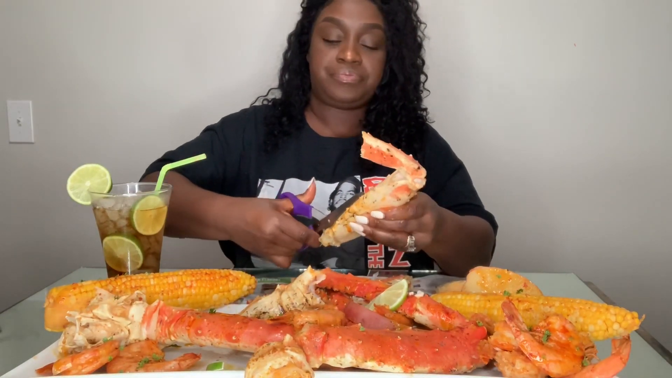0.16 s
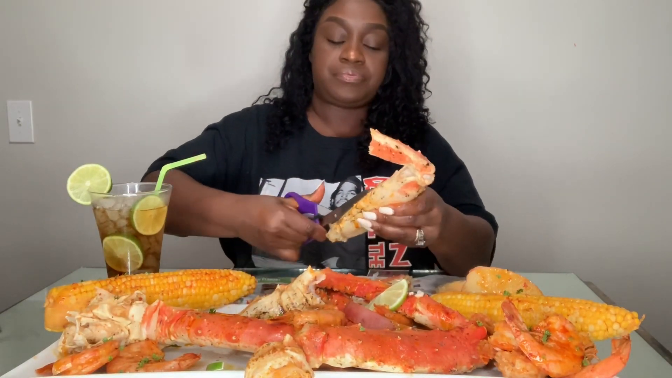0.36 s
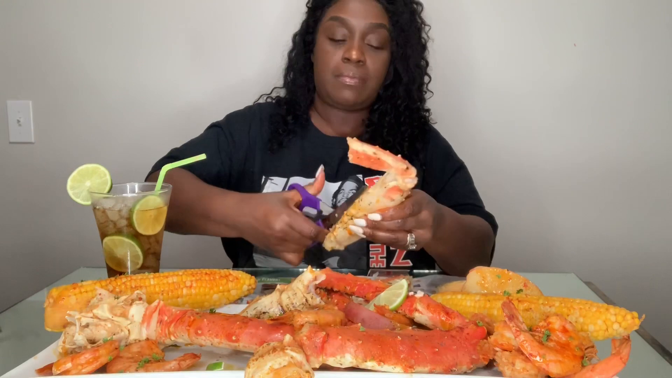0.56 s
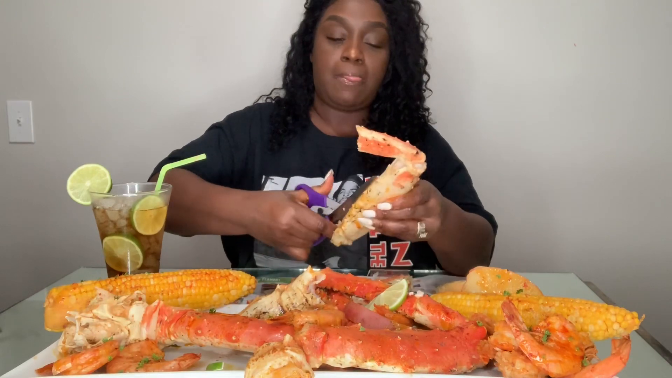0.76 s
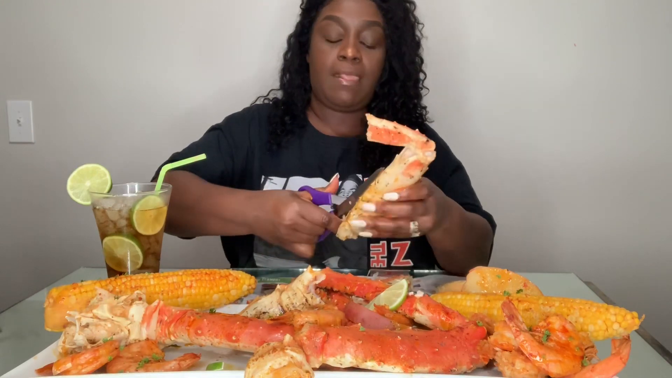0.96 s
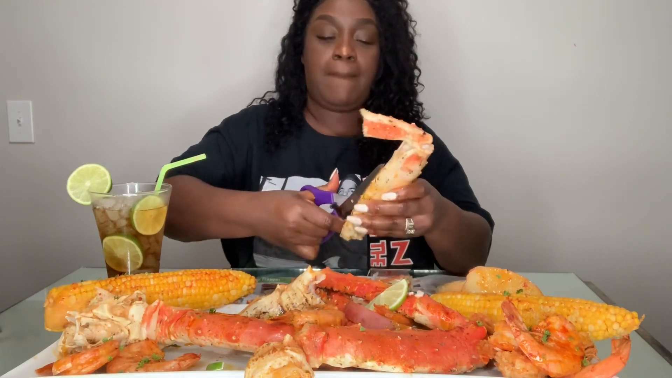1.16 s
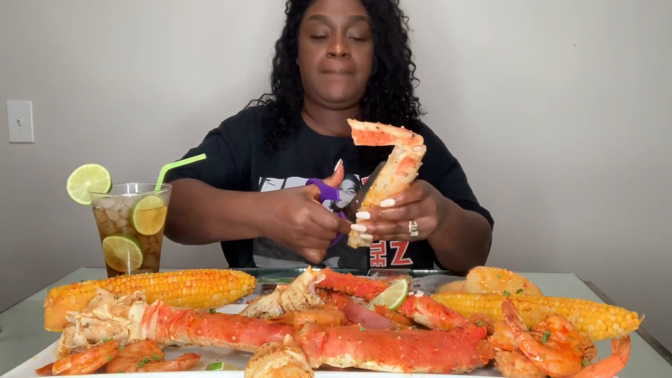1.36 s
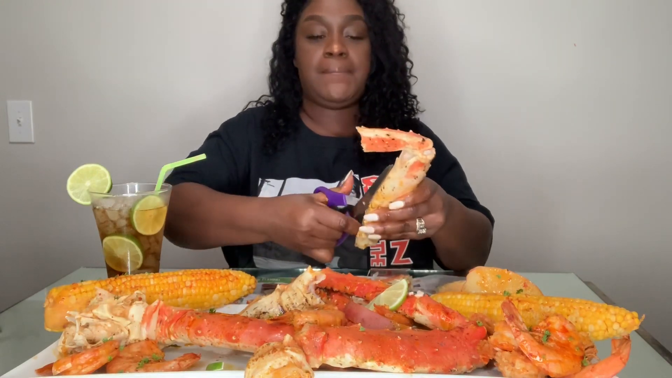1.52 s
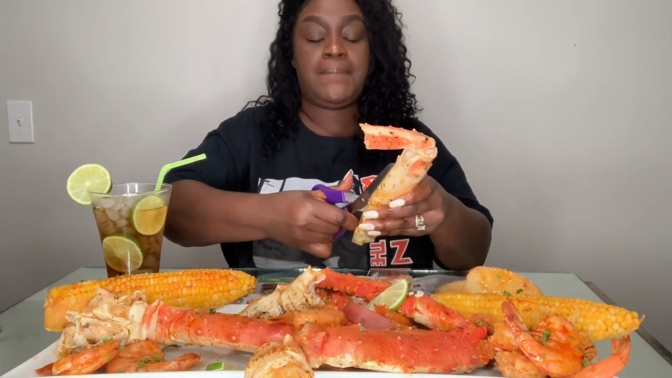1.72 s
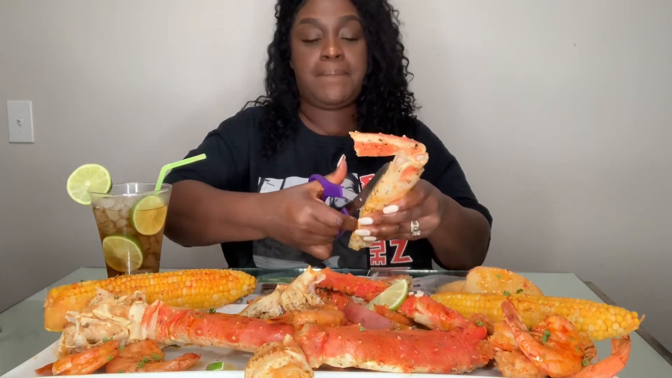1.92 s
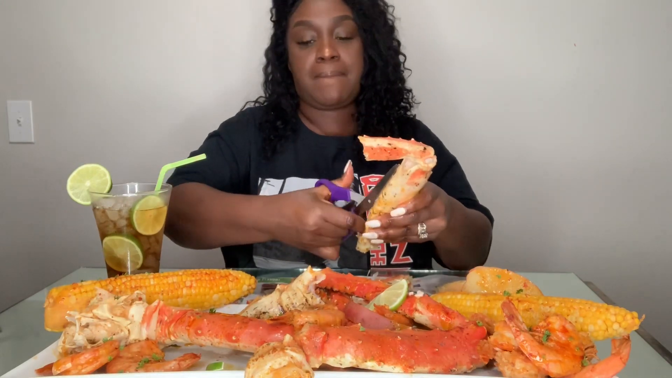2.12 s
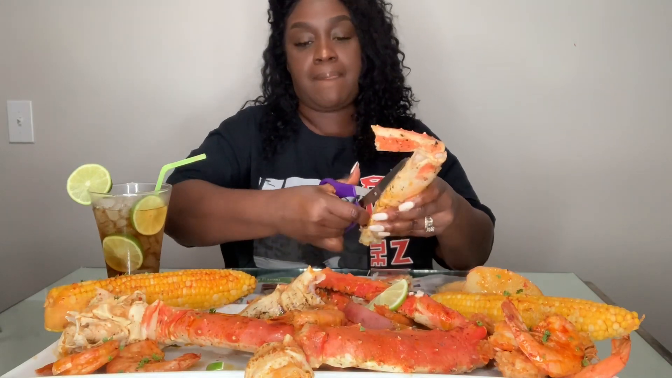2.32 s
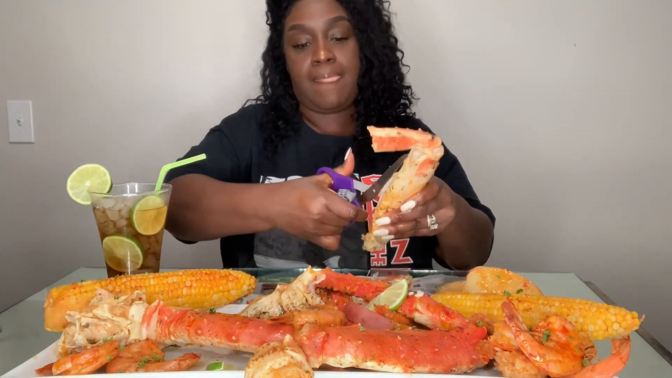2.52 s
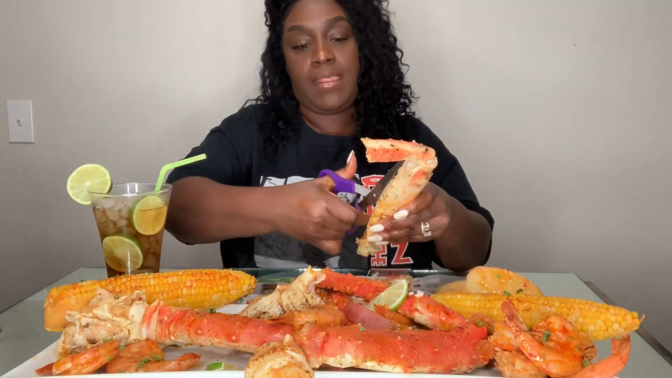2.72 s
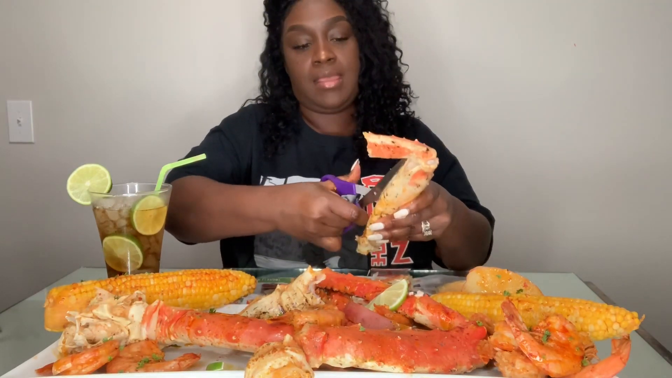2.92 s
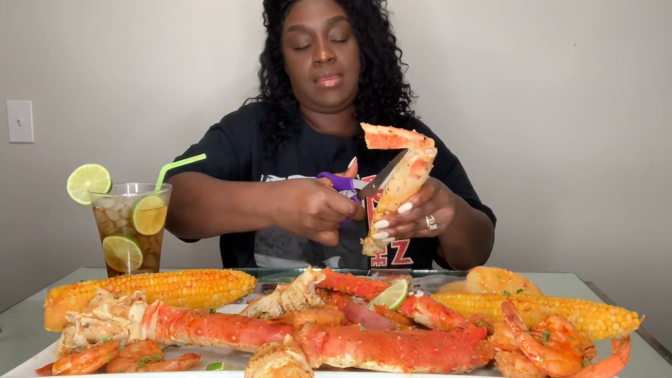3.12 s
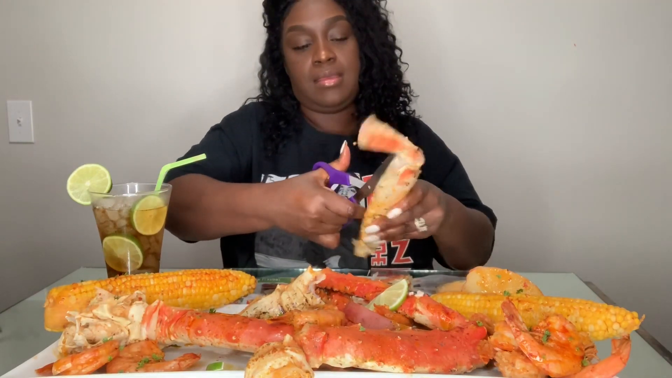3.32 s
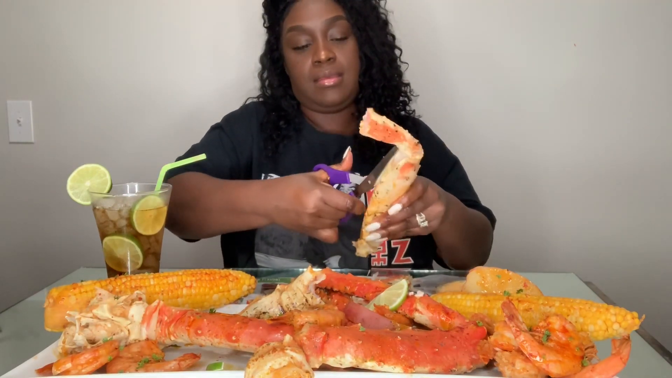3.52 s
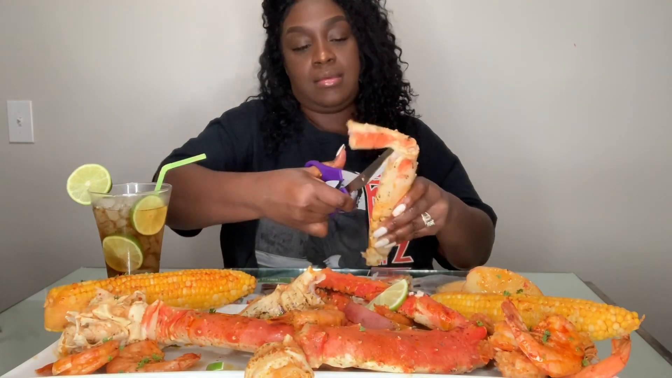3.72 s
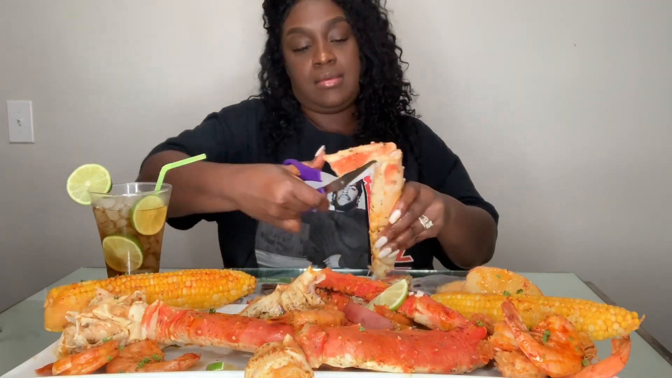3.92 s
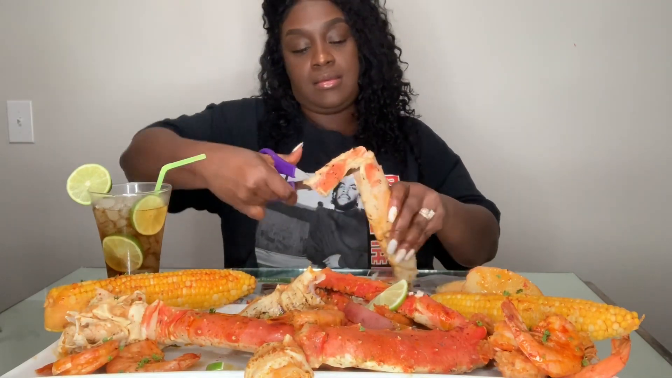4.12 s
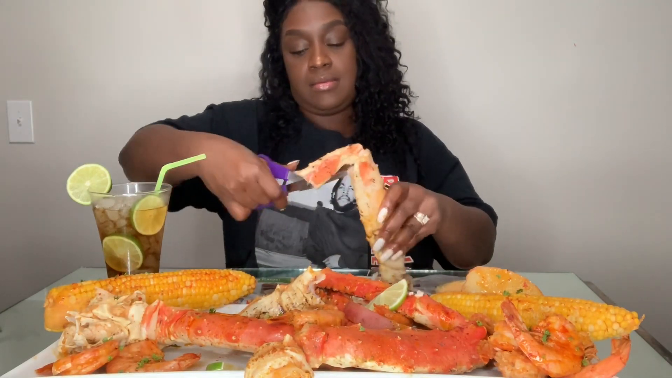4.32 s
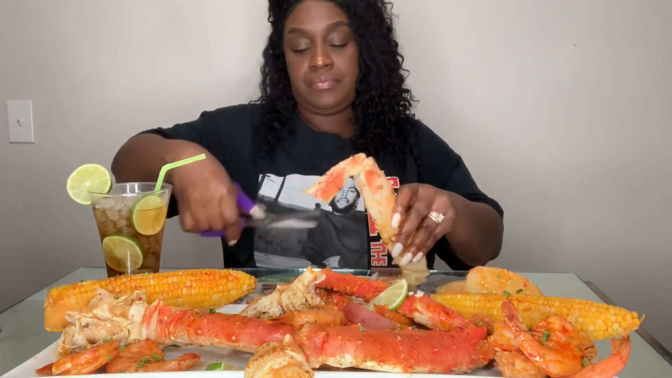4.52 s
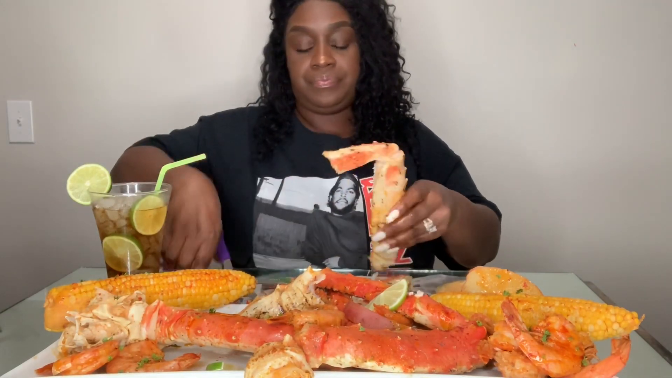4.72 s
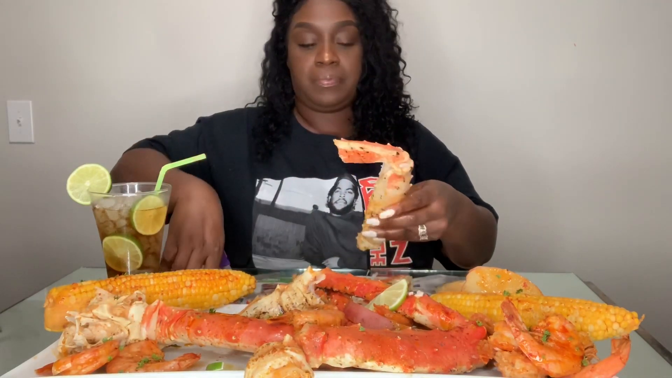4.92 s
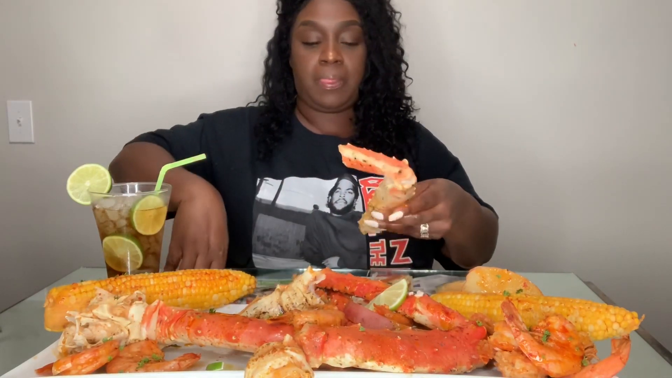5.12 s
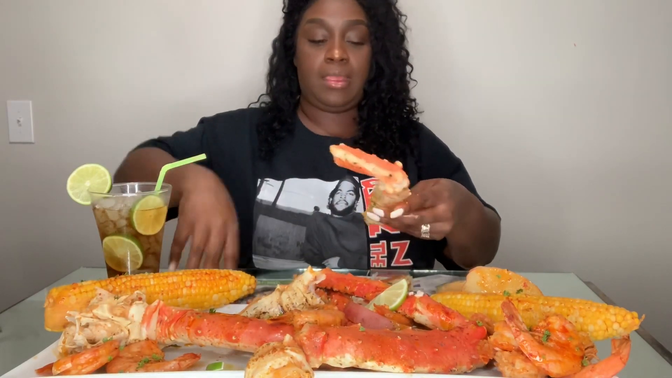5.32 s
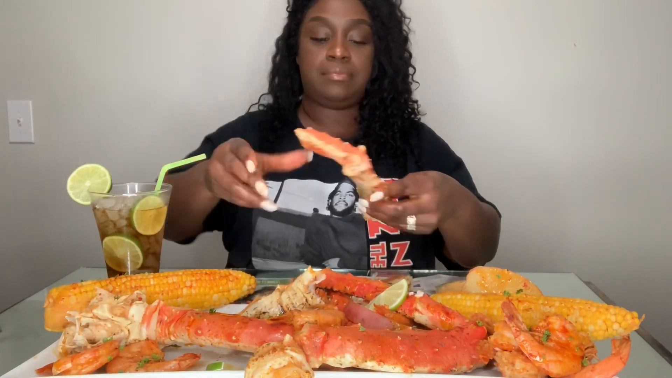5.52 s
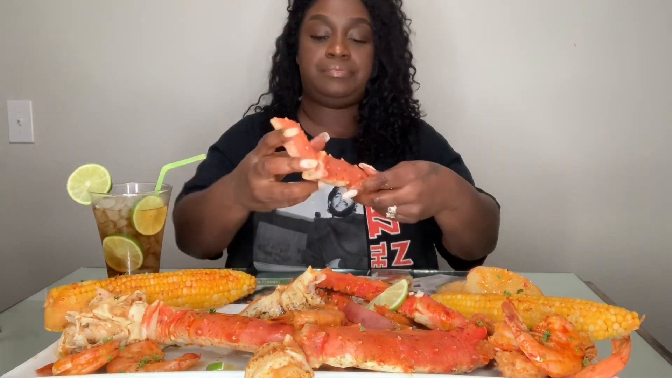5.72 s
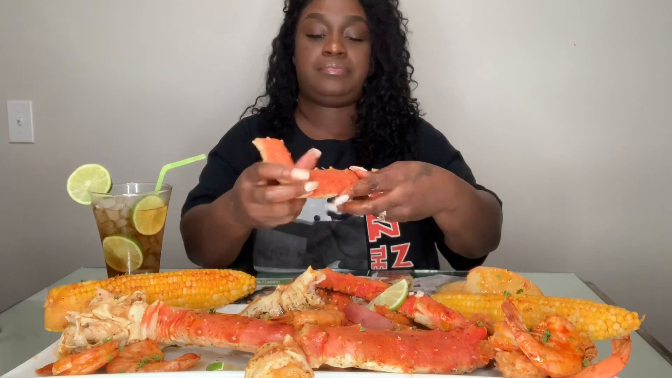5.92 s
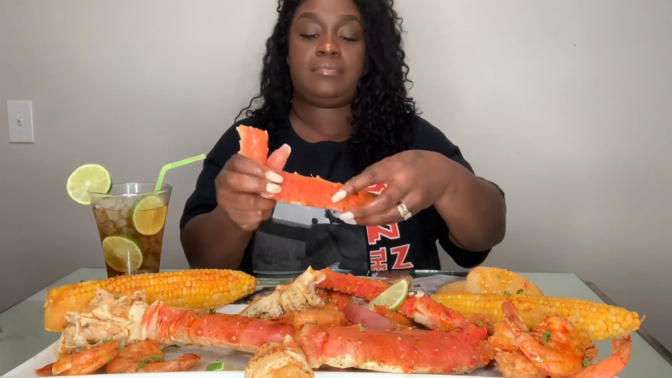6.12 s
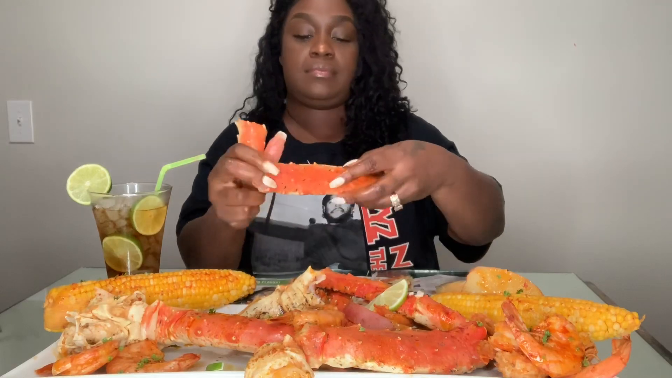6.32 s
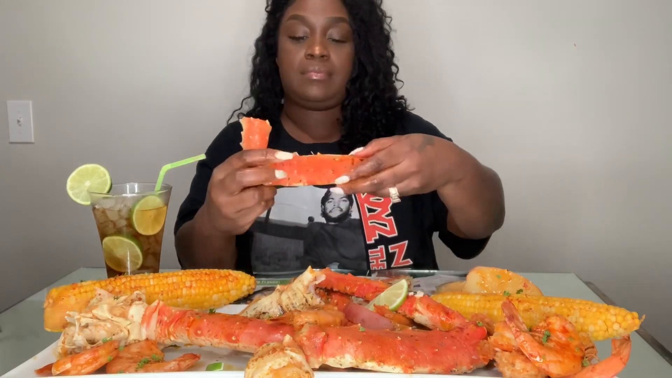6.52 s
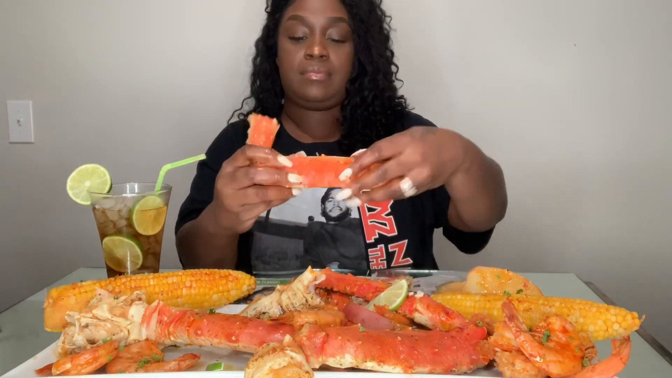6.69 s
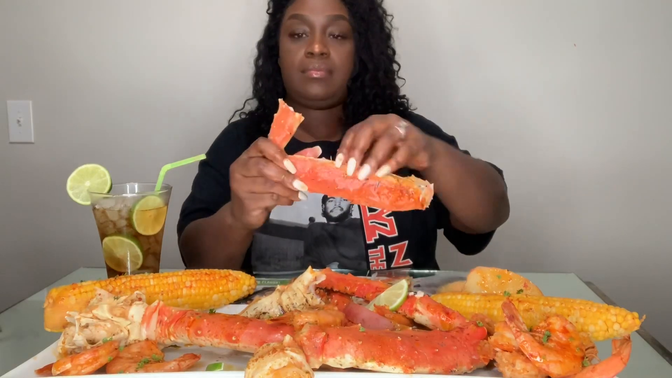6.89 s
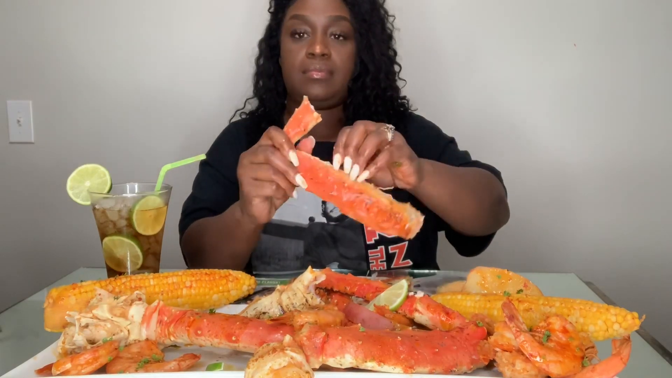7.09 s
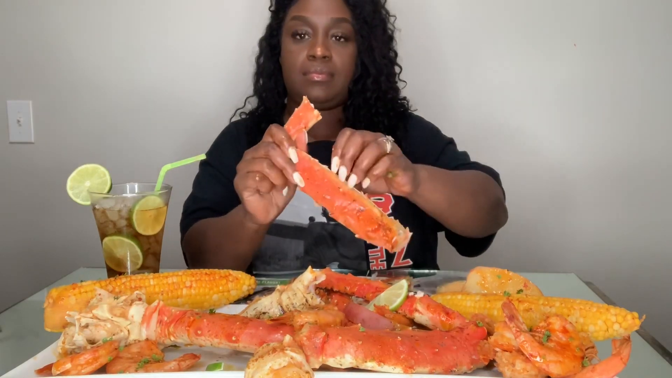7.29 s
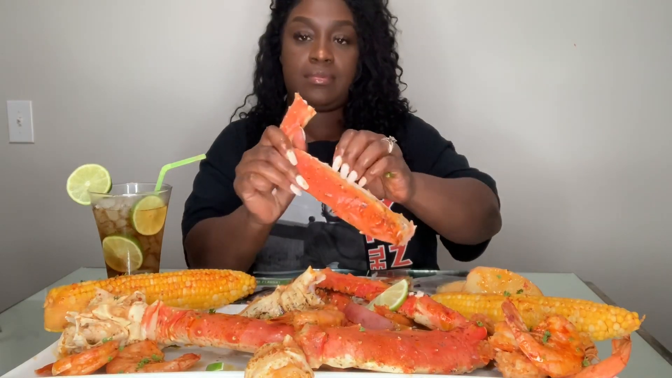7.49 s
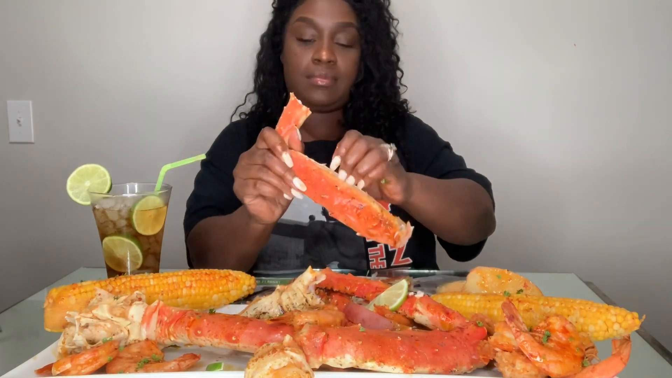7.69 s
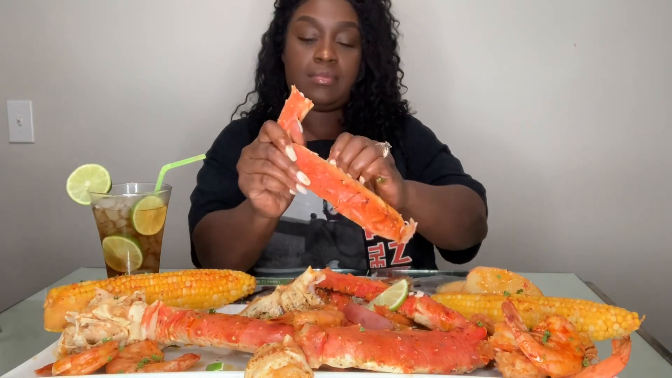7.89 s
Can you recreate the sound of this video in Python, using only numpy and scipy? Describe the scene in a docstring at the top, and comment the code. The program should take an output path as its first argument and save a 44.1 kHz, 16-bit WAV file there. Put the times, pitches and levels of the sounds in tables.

```python
"""In a small bare kitchen, kitchen shears bite through a crab leg close to two microphone ports.
Each crack is a short volley of fractures ringing the hollow leg and shell; scraping is a hail of
tiny fractures. The shears clatter down on the table on steel modes, the table top booms, and fingers
pry the shell open. Echoes and a tail of changing colour answer; shaped noise makes the ventilation
rumble, drone and hum underneath. Both ports clip whatever exceeds full scale."""
import sys
import numpy as np
from scipy import signal
from scipy.fft import rfft, irfft
from scipy.io import wavfile
from scipy.ndimage import uniform_filter1d

SR = 44100
rng = np.random.default_rng(int(sys.argv[2]) if len(sys.argv) > 2 else 0)


def to_wav(s):
    """Save 16-bit WAV."""
    ch = np.atleast_2d(s).T  # columns
    pcm = np.round(np.clip(ch, -1, 1) * 32767)  # PCM
    wavfile.write(sys.argv[1], SR, pcm.astype(np.int16))


N = 350595  # length in samples


def gain_of(db):
    """Amplitude factor of a level in dB."""
    return 10 ** (np.asarray(db) / 20)


def evened(x):
    """Scales a sound to rms 1."""
    return x / np.sqrt(np.mean(x ** 2) + 1e-20)


def read_curve(points, hz):
    """Reads a (Hz, value) table along a logarithmic frequency axis."""
    f, value = np.transpose(points)
    return np.interp(np.log(hz + 1), np.log(f + 1), value)


def add(mix, start_s, sound):
    """Lays a sound into the mix, cut off at the end of the mix."""
    part = mix[round(start_s * SR):][:len(sound)]
    part += sound[:len(part)]


def ring(x, modes):
    """Sum of resonances; white noise of rms 1 comes out with rms about 1."""
    out, power = 0, 0
    for k, (hz, width_hz, db) in enumerate(modes):
        sign = (-1) ** k
        resonance = signal.lfilter(*signal.iirpeak(hz, hz / width_hz, SR), x)
        out = out + sign * gain_of(db) * resonance
        power += gain_of(2 * db) * np.pi * width_hz / SR
    return out / np.sqrt(power)


def stereo_spectra(hz, frames, likeness):
    """Two random short-time spectra, as alike left and right as the likeness table says."""
    a, b, c, d = rng.standard_normal((frames, len(hz), 4)).T
    like = np.clip(read_curve(likeness, hz), -1, 1)[:, None]
    left, other = a + 1j * b, c + 1j * d
    return np.array([left, like * left + np.sqrt(1 - like ** 2) * other])


# Colour of the ventilation air. Each row: frequency in Hz, relative level in dB per Hz.
AIR_COLOUR = [(8.8, -61), (15, -24.5), (70, -2.5), (92, -14.5), (106, -19), (179, -27), (213, -24.5),
              (321, -29), (455, -34), (559, -35), (726, -37.5), (793, -44.5), (6670, -62.5), (12300, -59.5),
              (16000, -66)]
# How alike the air is at both ports. Each row: frequency in Hz, left-right likeness (1 = same).
AIR_LIKENESS = [(25, .99), (60, .96), (290, .85), (640, .55), (1410, .3), (3100, .05)]
# Droning room modes. Each row: frequency in Hz, width of each filter pass in Hz, level in dB rms.
DRONES = [(53.7, 9.1, -58), (78.53, 13, -48)]
# A low hum comes and goes. Each row: time in seconds, level in dB.
HUM_LEVEL = [(0.0, -54.5), (0.26, -43), (1.77, -53.5), (1.82, -38.5), (2.37, -49.5), (4.74, -54),
             (4.8, -43), (5.11, -60.5), (5.18, -35.5), (5.67, -54), (7.86, -55), (7.95, -46)]
AIR_DB, HUM_HZ, HUM_WIDTH_HZ = -38.5, 129.5, 20


def fuzzy_tone(noise, hz, width_hz):
    """Noise passed twice through one narrow resonance wavers like a fuzzy tone."""
    mode = [(hz, width_hz, 0)]
    return evened(ring(ring(noise, mode), mode))


def ventilation():
    """Steady air noise, two droning room modes and a fuzzy hum, all made from random noise."""
    hz = np.fft.rfftfreq(2048, 1 / SR)
    spectra = stereo_spectra(hz, N // 512 + 5, AIR_LIKENESS)
    spectra = spectra * gain_of(read_curve(AIR_COLOUR, hz))[:, None]
    air = signal.istft(spectra, nperseg=2048, noverlap=1536)[1][:, :N]
    air = gain_of(AIR_DB) * evened(air)
    noise = rng.standard_normal((3, N))
    drones = sum(gain_of(db) * fuzzy_tone(x, hz, width_hz)
                 for x, (hz, width_hz, db) in zip(noise, DRONES))
    hum_db = np.interp(np.arange(N) / SR, *np.transpose(HUM_LEVEL))
    hum = gain_of(hum_db) * fuzzy_tone(noise[2], HUM_HZ, HUM_WIDTH_HZ)
    return air + drones + hum


# Modes of the crab leg, close by: the air in the hollow leg, the whole leg flexing, the shell plates
# and the splinters. Each row: frequency in Hz, width in Hz, level in dB relative to its own set.
LEG_AIR = [(1150, 390, 0), (1607, 210, -2)]
LEG_KNOCK = [(422, 260, -4), (581, 94, 2), (860, 430, -4)]
SHELL_SNAP = [(2196, 960, 3.5), (2446, 1950, 7), (3652, 750, 4.5), (4040, 380, -1.5), (4910, 2400, -3.5)]
SPLINTER_FIZZ = [(6430, 4000, -8), (8360, 820, 2.5), (10000, 410, 3.5), (12500, 1900, -3),
                 (14600, 3200, -6.5)]
# Blades and fingers scraping and crushing shell. Each row: start in seconds, length in seconds,
# level in dB, splinter fizz against the hollow-leg ring in dB.
SCRAPES = [(0, 0.021, -51, 0.5), (0.188, 0.16, -33, 1.5), (0.531, 0.078, -40, -4.5),
           (0.741, 0.19, -52, 13.5), (0.987, 0.23, -58.5, 4.5), (1.191, 0.13, -47, -0.5),
           (1.478, .14, -43, 5.5), (1.671, 0.044, -41, 13.5), (1.9, 0.093, -39.5, -7.5),
           (2.477, 0.14, -47.5, 1), (2.571, 0.18, -38.5, -6.5), (2.96, 0.22, -43, -1),
           (3.29, 0.14, -40.5, -4.5), (3.51, 0.11, -49, 9.5), (3.684, 0.2, -35.5, -6.5),
           (3.866, 0.27, -47, 1), (4.105, 0.087, -37, -11.5), (4.426, 0.049, -46, -4.5),
           (4.776, .16, -46, -2.5), (4.978, 0.16, -49, -4), (5.747, 0.052, -49, -21.5),
           (5.97, .12, -58, -11.5), (6.077, .13, -54.5, -34), (6.267, 0.057, -64, -20),
           (6.547, 0.2, -72, -23), (6.735, 0.1, -51, -20), (6.865, 0.11, -53, -24.5),
           (7.02, 0.24, -53, -24), (7.325, 0.058, -46.5, -24.5), (7.434, .1, -51, -15.5),
           (7.593, 0.25, -48.5, -15), (7.83, 0.074, -29, -12)]
GRAINS_PER_S, GRAIN_SPREAD_DB = 1800, 4.0
# dB against the hollow-leg ring; the shell plates also gain a share of the fizz dB
SCRAPE_SNAP_DB, SCRAPE_SNAP_PER_FIZZ, SCRAPE_KNOCK_DB = 4.9, 0.28, -11.5


def crunch():
    """Each stroke is a random hail of tiny fractures that swells and fades, ringing leg and shell."""
    out = np.zeros(N)
    size_db = GRAIN_SPREAD_DB * np.minimum(rng.exponential(1, N), 5)
    size = gain_of(size_db) * rng.standard_normal(N)
    struck = rng.random(N) < GRAINS_PER_S / SR
    hail = np.pad(size * struck, (0, SR))
    for start_s, length_s, db, fizz_db in SCRAPES:
        n = round(length_s * SR)
        grains = evened(hail[round(start_s * SR):][:n])
        stroke = np.pad(grains * signal.windows.tukey(n, .7), (0, 800))  # time to ring out
        snap_db = SCRAPE_SNAP_DB + SCRAPE_SNAP_PER_FIZZ * fizz_db
        body = ring(stroke, LEG_AIR) + gain_of(SCRAPE_KNOCK_DB) * ring(stroke, LEG_KNOCK)
        snap = gain_of(snap_db) * ring(stroke, SHELL_SNAP)
        fizz = gain_of(fizz_db) * ring(stroke, SPLINTER_FIZZ)
        add(out, start_s, gain_of(db) * (body + snap + fizz))
    return out


def peaked(x, volley_ms):
    """Scales a burst to the energy of a volley of height 1."""
    return x / np.sqrt(np.sum(x ** 2) / (volley_ms * SR / 1000))


def gripped(modes, chance):
    """The same modes, shifted and weighted anew by where the shell is held and broken."""
    return [(hz * (1 + .05 * a), width_hz, db + 2.0 * b)
            for (hz, width_hz, db), (a, b) in zip(modes, chance)]


# The clear cracks, close by. Each row: time in seconds, ring of the hollow leg in dB, its pitch in Hz,
# knock against the ring in dB, splinter fizz against the ring in dB.
CRACKS = [(0.2207, -11.5, 1020, -50, 1.5), (0.244, -41, 1270, -19, 4), (0.2598, -41, 996, -17, 19),
          (0.2777, -23.5, 1040, -9, 11), (0.3167, -28.5, 1290, 1, 1), (0.58, -34.5, 1530, -1, 5.5),
          (0.7841, -38.5, 993, -27, 10), (0.7935, -31.5, 1590, -2.5, 1), (0.8286, -17.5, 1110, -14, -0.5),
          (0.841, -23, 1500, -23, -7), (0.8729, -19, 1480, -9.5, 3), (0.9072, -24.5, 1320, -6.5, 1),
          (1.0219, -36.5, 1290, -16, -8), (1.2437, -34.5, 1110, 0.5, 8), (1.5307, -23.5, 1150, -1.5, 2),
          (1.5837, -31.5, 1340, -0.5, 8), (1.6152, -36, 1610, -6, 12.5), (1.6845, -22, 1320, -6, -8),
          (1.7025, -24.5, 1650, -30, -3.5), (1.933, -25.5, 1280, -30, -47), (1.9476, -22, 1620, -11.5, -63),
          (2.153, -43.5, 1270, -7, 6.5), (2.2035, -23.5, 1130, -3, 9.5), (2.2593, -14.5, 1620, -1, 1),
          (2.3371, -22, 1330, 2.5, 9), (2.4703, -45.5, 2180, -13.5, 9.5), (2.5137, -36, 1700, -4, -10),
          (2.5732, -28, 1250, -5.5, -49), (2.635, -26, 1300, -9, -13.5), (2.6659, -25, 1280, -1.5, -45),
          (2.8759, -19.5, 1196, -3.5, 2.5), (2.9683, -11, 1470, -2, 6), (2.978, -20, 1650, -9, -13),
          (2.9888, -17.5, 1610, 1.5, 9), (3.0014, -22.5, 1640, -15, 10.5), (3.0713, -22, 1880, -1.5, 4.5),
          (3.0911, -30.5, 1600, -1, 9.5), (3.2023, -36.5, 1720, -5, 8), (3.3282, -30.5, 1570, -8, -15),
          (3.349, -31, 1260, 4.5, -12), (3.37, -18.5, 1480, -3, -22), (3.3947, -30, 1570, -11, -16),
          (3.5651, -31.5, 1240, -2, 0), (3.5813, -20.5, 1190, 1.5, 10.5), (3.6035, -24, 1340, -16, -10),
          (3.6429, -13, 1143, 1.5, 3.5), (3.7094, -29, 1150, 8.5, 7), (3.7679, -23, 1210, 3, -34),
          (3.7938, -18.5, 1226, -31, 0), (3.91, -42, 1367, 6.5, 9), (3.933, -30, 1400, 1.5, -20),
          (4.0985, -16.5, 1220, -8.5, -41.5), (4.155, -30, 1220, -25.5, -14.5),
          (4.312, -47.5, 1870, -19.5, -29), (4.3772, -37.5, 940, 7, -17.5), (4.4724, -38, 1230, -9, 2),
          (4.7643, -17.5, 1600, -8, -34.5), (4.8631, -34.5, 1160, -0.5, -20),
          (5.0003, -37.5, 1300, -1.5, -18), (5.0387, -38.5, 1270, -2.5, -18),
          (5.1352, -37, 1400, -17, -9.5), (5.757, -38, 1520, -6.5, -39.5), (6.105, -46.5, 1160, -13, -37),
          (6.1602, -34.5, 1680, -26.5, -41.5), (6.4106, -39, 1554, -16, -40.5),
          (6.8844, -41, 1176, -8, -40.5), (6.9431, -43, 1010, -8, -27), (7.0309, -34, 1450, -4, -30),
          (7.0592, -24, 1440, -10.5, -40), (7.1482, -28, 1170, -9, -39.5), (7.2311, -33.5, 1630, -5, -12),
          (7.3587, -35.5, 1550, -3, -43.5), (7.4827, -24.5, 1630, -19, -31.5),
          (7.5898, -16.5, 1440, -6.5, -21.5), (7.7343, -35.5, 1380, 2, -54), (7.8293, -28.5, 1720, -8, -49),
          (7.844, -15, 2370, -15.5, 1), (7.864, -15.5, 1204, -37, -1)]
# The shears clatter down on the table. Each row: time in seconds, hollow ring in dB, its pitch in Hz,
# knock against the ring in dB, fizz against the ring in dB.
CLATTERS = [(5.1791, -13.5, 1460, 1, 9.5), (5.1909, -12, 1500, -14, 1), (5.4159, -14.5, 1450, -4, -8.5)]
# Blades and handles, damped by the hand. Each row: frequency in Hz, width in Hz, relative level in dB.
STEEL = [(2150, 700, -3), (2800, 700, 0), (3700, 900, -1), (5200, 1200, 2), (6500, 1200, -2)]
RING_WIDTH_HZ = 200
SWELL_MS, VOLLEY_MS = 1.8, 2.38  # rise, and typical decay, of one volley
VOLLEY_SPREAD = .2  # how much the decay varies, as a log ratio
# a brittle break that splinters also snaps the shell plates: dB against the ring, and share of the fizz dB
SNAP_DB, STEEL_DB, SNAP_PER_FIZZ = 0.67, 6.5, 0.25


def cracks():
    """Volleys of uneven fractures swell and die in milliseconds; dropped shears rattle on steel modes."""
    blows = [(*row, SHELL_SNAP, SNAP_DB) for row in CRACKS]
    blows += [(*row, STEEL, STEEL_DB) for row in CLATTERS]
    out, ms = np.zeros(N), np.arange(2048) * 1000 / SR - 10
    noise, lumps = rng.standard_normal((len(blows), 2, len(ms))).transpose(1, 0, 2)
    grips = np.clip(rng.standard_normal((len(blows), 11, 2)), -2, 2)
    uneven_db = 1.7 * evened(uniform_filter1d(lumps, 24, axis=1))
    grits = noise * gain_of(uneven_db)
    for (s, db, hz, knock_db, fizz_db, plates, plates_db), grit, grip in zip(blows, grits, grips):
        volley_ms = VOLLEY_MS * np.exp(VOLLEY_SPREAD * grip[-1, 0])
        shape = np.exp(np.where(ms < 0, ms / SWELL_MS, -ms / volley_ms))
        spectrum = rfft(grit * shape)
        # flattened: fractures excite all modes about evenly
        volley = irfft(spectrum / abs(spectrum) ** .6) * shape ** .2
        hollow_modes = [(hz, RING_WIDTH_HZ, 0)] + [(f, width, d - 8) for f, width, d in LEG_AIR]
        hollow = ring(volley, hollow_modes)
        knock = ring(ring(volley, LEG_KNOCK), [(605, 1400, 0)])  # a thin leg sends out no bass
        snap = ring(volley, gripped(plates, grip))
        fizz = ring(volley, gripped(SPLINTER_FIZZ, grip[len(SHELL_SNAP):]))
        snap_db = plates_db + SNAP_PER_FIZZ * fizz_db
        parts = (0, hollow), (knock_db, knock), (snap_db, snap), (fizz_db, fizz)
        crack = sum(gain_of(d) * peaked(x, volley_ms) for d, x in parts)
        add(out, s - .009, gain_of(db) * crack)  # the swell leads up to the listed time
    return out


# Blows on the table top. Each row: start in seconds, peak level in dB.
THUDS = [(4.788, -25), (4.815, -25.5), (4.841, -32), (4.879, -45.5), (5.181, -19.5), (5.419, -34),
         (2.973, -40.5), (3.648, -28)]
# Modes of the table top. Each row: frequency in Hz, width in Hz, relative level in dB.
TABLE_MODES = [(129, 90, 2.5), (268, 150, -2.5), (437, 41, -6.5)]


def table():
    """The table top booms loosely when the shears or a hand land on it: a noise burst rings its modes."""
    out, t = np.zeros(N), np.arange(SR // 4) / SR
    noises = rng.standard_normal((len(THUDS), len(t)))
    for (start_s, db), noise in zip(THUDS, noises):
        blow = noise * t * np.exp(-t / 0.01)  # strongest after 10 ms
        boom = ring(ring(blow, TABLE_MODES), [(250, 2200, 0)])
        add(out, start_s, gain_of(db) * boom / abs(boom).max())
    return out


# Decay of the small bare room. Each row: frequency in Hz, time to fall by 60 dB in seconds.
ROOM_DECAY = [(250, 0.42), (660, 0.29), (1740, 0.35), (4590, 0.47), (12100, 0.26)]
# How alike the tail is at both ports. Each row: frequency in Hz, left-right likeness (1 = same).
ROOM_LIKENESS = [(200, 0.95), (700, 1), (1500, 0.29), (4000, 0.45), (12000, 1)]
# Single echoes off table top and walls. Each row: shortest delay in ms, level in dB against the direct sound.
ECHOES = [(1.6, -9), (4.5, -14), (10.5, -18), (22, -16)]
TAIL_DB, BUILD_UP_S, TURNS_PER_S = -2.0, 0.003, 1.7


def room(x):
    """Direct sound, a few single echoes, and a dense tail in which each band dies at its own speed."""
    hz, t = np.fft.rfftfreq(256, 1 / SR), np.arange(400) * 64 / SR
    # three random room responses take turns, so the tail's colour keeps changing
    turn, out = 2 * np.pi * np.arange(N) / SR * TURNS_PER_S, 0
    for k in range(3):
        decay = gain_of(-60 * t / read_curve(ROOM_DECAY, hz)[:, None])
        spectra = stereo_spectra(hz, len(t), ROOM_LIKENESS) * decay
        taps = signal.istft(spectra, nperseg=256, noverlap=192)[1]
        taps *= 1 - np.exp(-(np.arange(taps.shape[1]) / SR / BUILD_UP_S) ** 2)
        taps *= gain_of(TAIL_DB) / np.linalg.norm(taps[0])
        for ms, db in ECHOES:
            delays = round(ms * SR / 1000) + 20 * k + rng.integers(0, 3, size=2)
            taps[[0, 1], delays] += gain_of(db)
        share = np.sqrt(2 / 3) * np.cos(turn + 2 * np.pi * k / 3)
        out = out + signal.fftconvolve((share * x)[None], taps, axes=1)[:, :N]
    return x + out


def scene():
    """Cracks, crunching and table top sound in the room; the ventilation is added without it."""
    return room(cracks() + crunch() + table()) + ventilation()


# Colour difference of the two microphone ports. Each row: frequency in Hz, left over right in dB.
PORT_BALANCE = [(60, 1), (180, 0), (550, -0.5), (1650, -2), (4970, -0.5), (15000, 1.5)]
# Phase of the left port. Each row: frequency in Hz, lead over the right in radians (negative = lag).
LEFT_PHASE = [(100, -.03), (800, -.5), (3270, -1.4), (6500, -1.6), (14000, -1.3)]
EDGE_HZ = 16300


def record(dry):
    """The ports differ in colour and phase; the converter clips; then the band limit."""
    hz = np.fft.rfftfreq(N, 1 / SR)
    left = gain_of(read_curve(PORT_BALANCE, hz) / 2)
    responses = [left * np.exp(1j * read_curve(LEFT_PHASE, hz)), 1 / left]
    ports = irfft(rfft(dry) * responses, N)
    clipped = np.clip(ports, -1, 1)
    low_pass = signal.firwin(511, EDGE_HZ, window=("kaiser", 9), fs=SR)
    return np.clip(signal.oaconvolve(clipped, low_pass[None], "same"), -1, 1)


dry = scene()
out = record(dry)
to_wav(out)
```